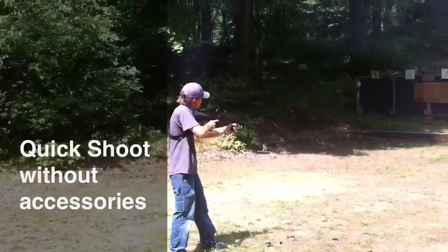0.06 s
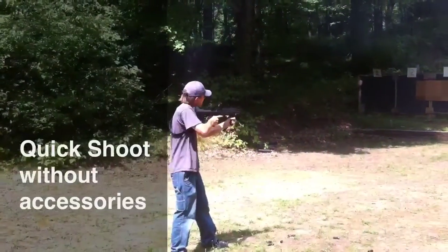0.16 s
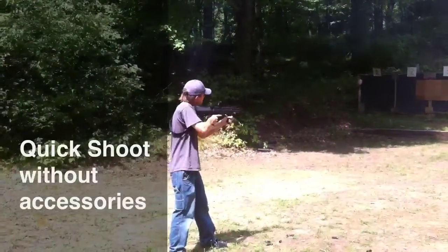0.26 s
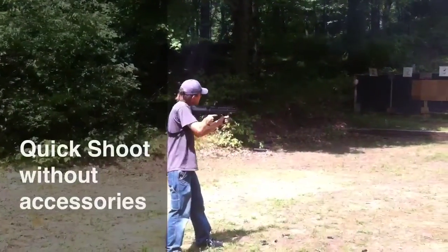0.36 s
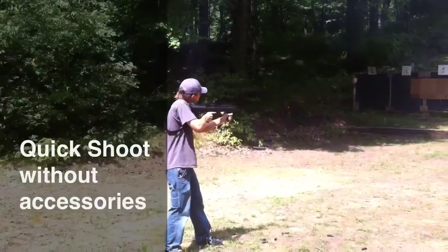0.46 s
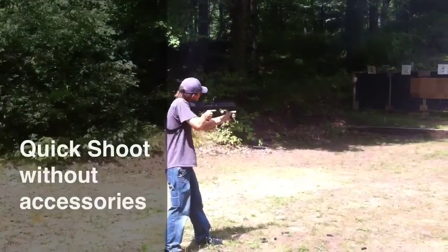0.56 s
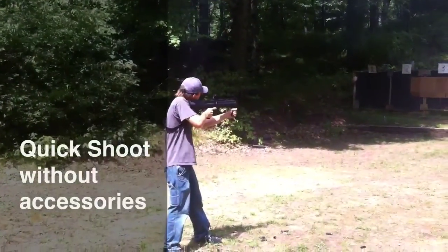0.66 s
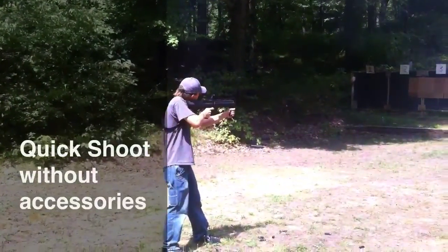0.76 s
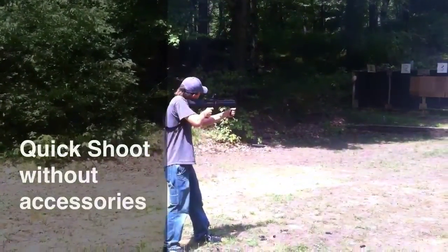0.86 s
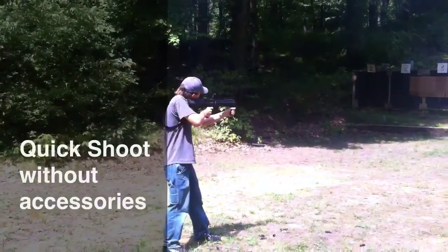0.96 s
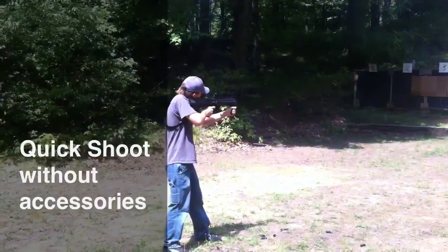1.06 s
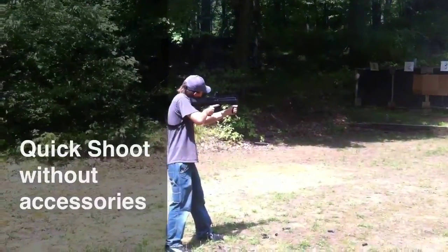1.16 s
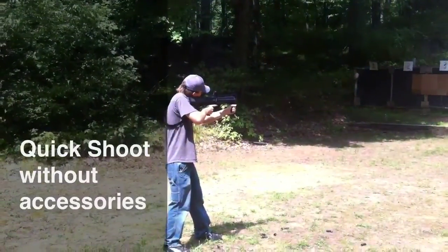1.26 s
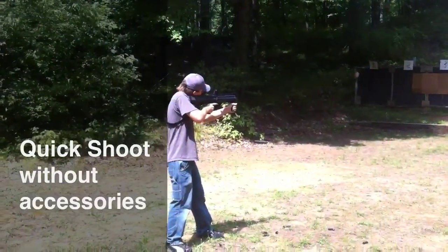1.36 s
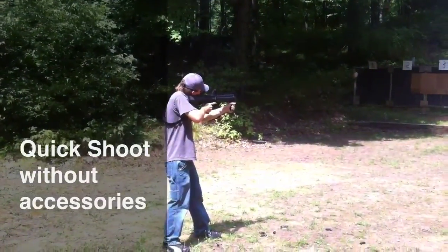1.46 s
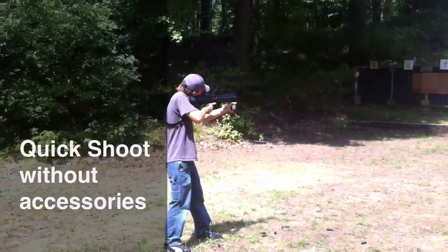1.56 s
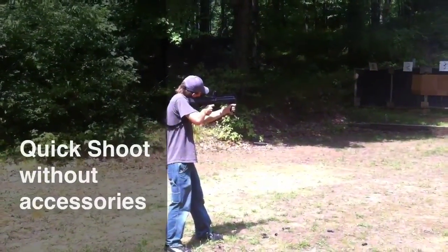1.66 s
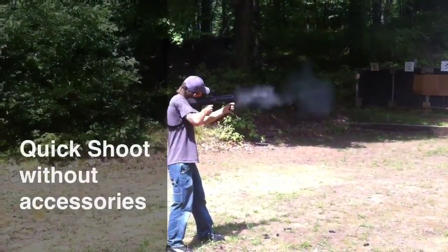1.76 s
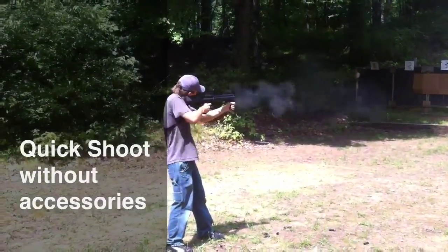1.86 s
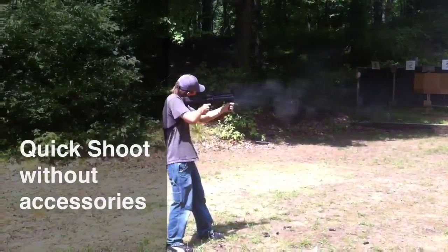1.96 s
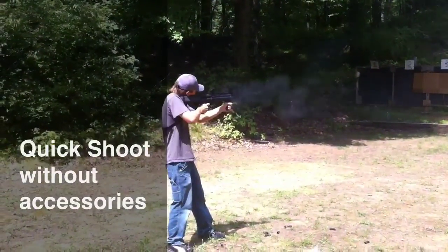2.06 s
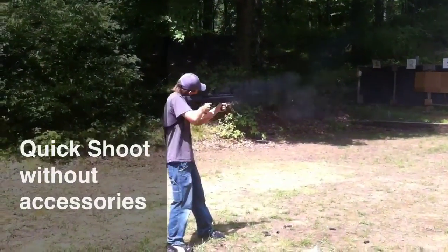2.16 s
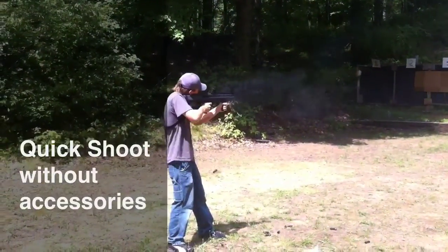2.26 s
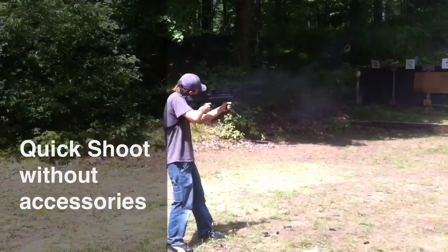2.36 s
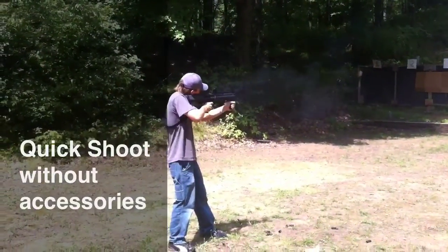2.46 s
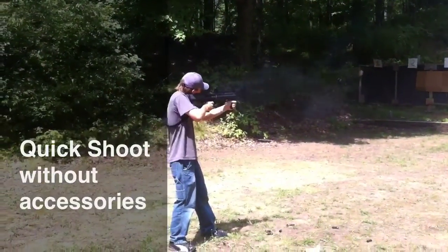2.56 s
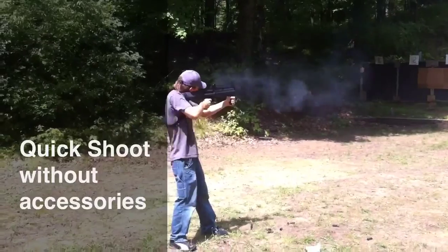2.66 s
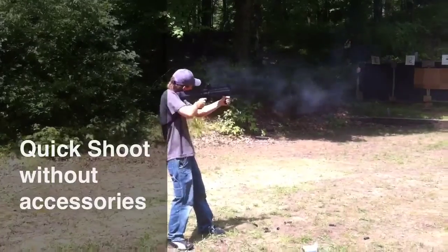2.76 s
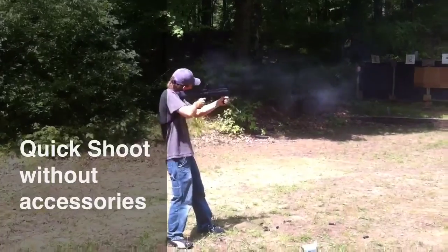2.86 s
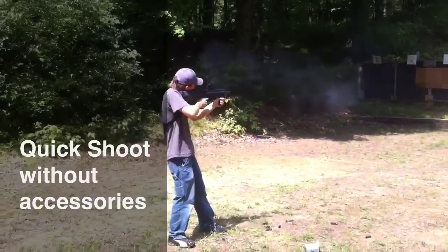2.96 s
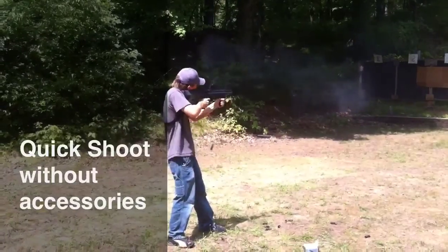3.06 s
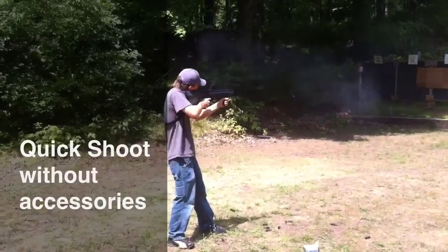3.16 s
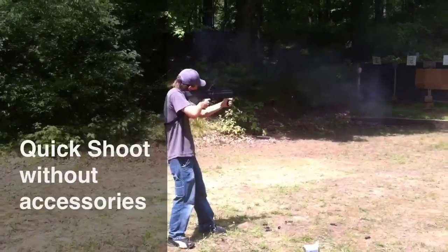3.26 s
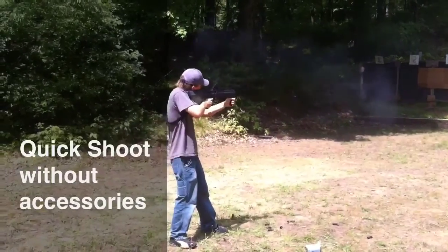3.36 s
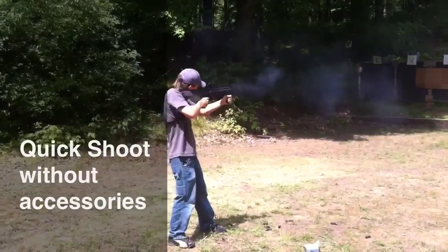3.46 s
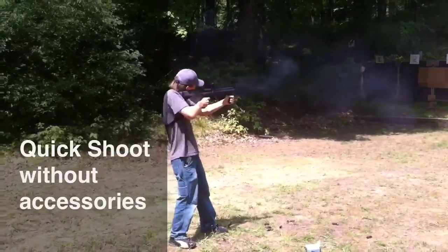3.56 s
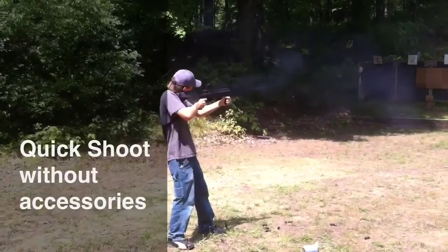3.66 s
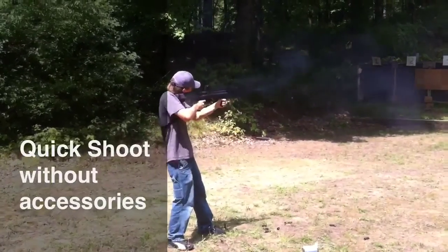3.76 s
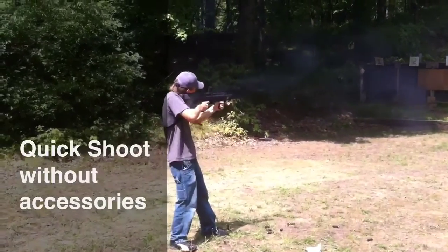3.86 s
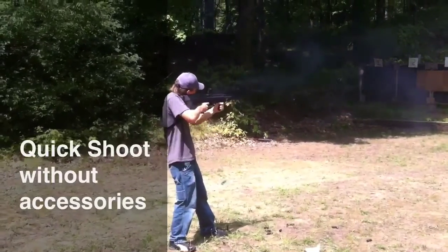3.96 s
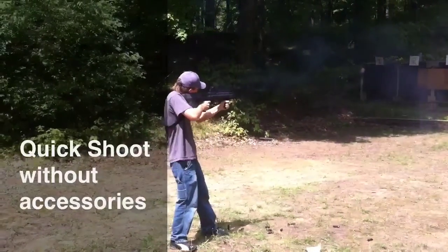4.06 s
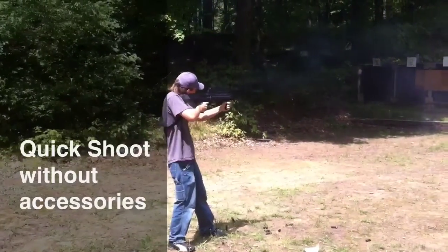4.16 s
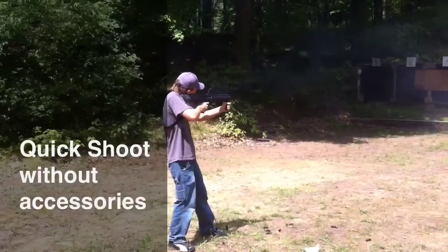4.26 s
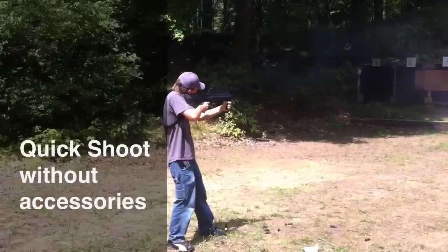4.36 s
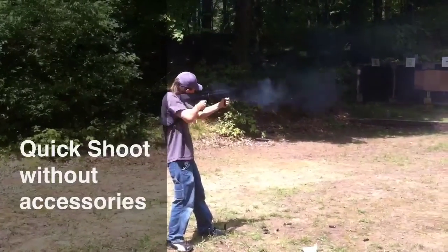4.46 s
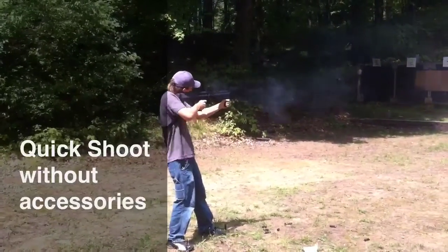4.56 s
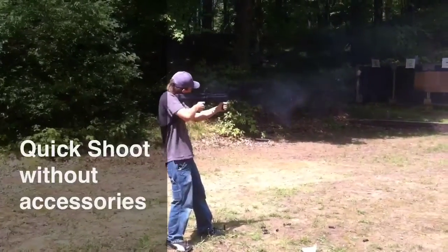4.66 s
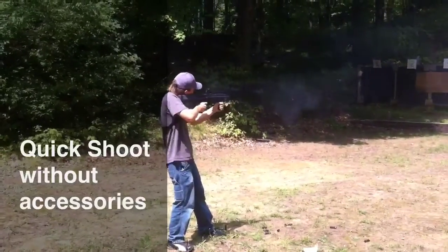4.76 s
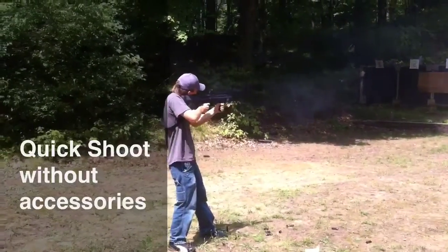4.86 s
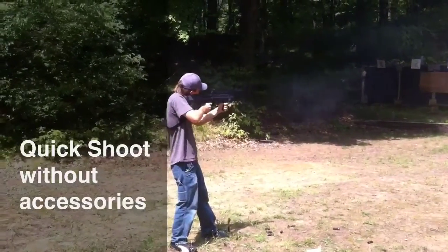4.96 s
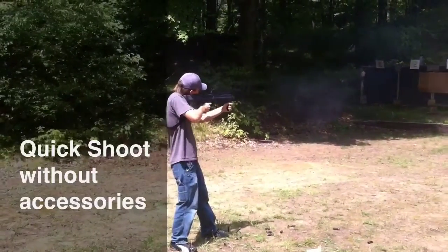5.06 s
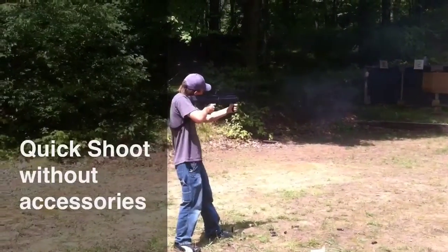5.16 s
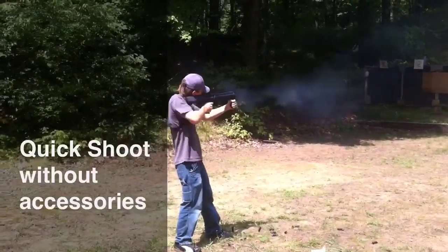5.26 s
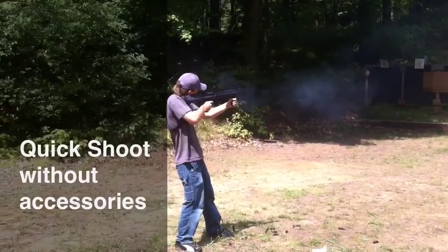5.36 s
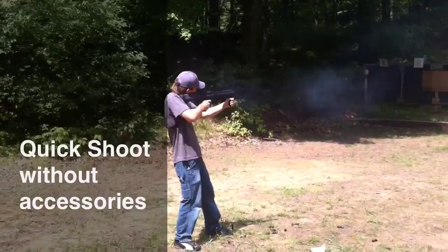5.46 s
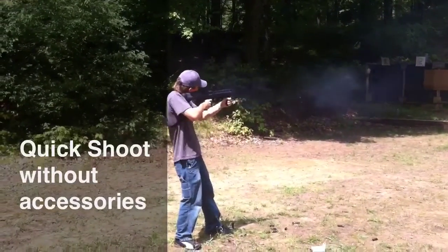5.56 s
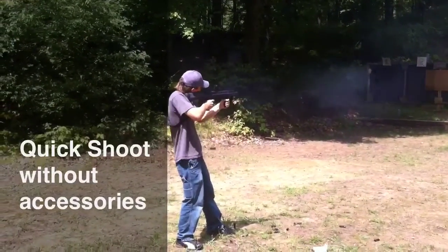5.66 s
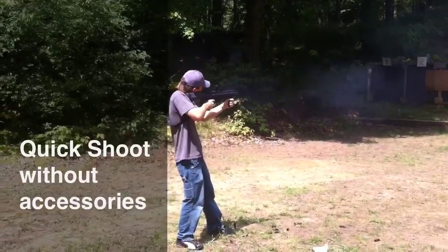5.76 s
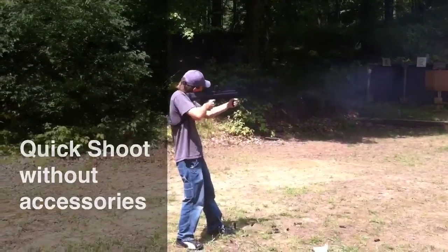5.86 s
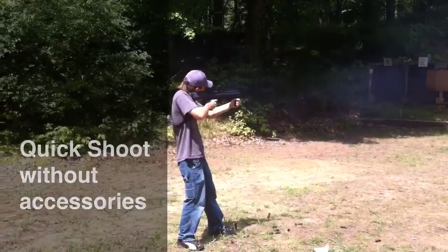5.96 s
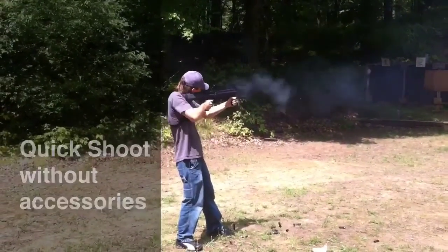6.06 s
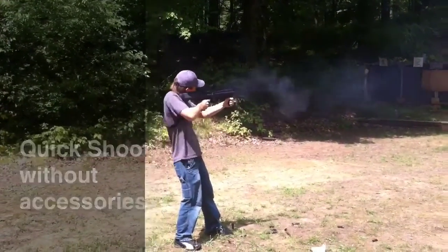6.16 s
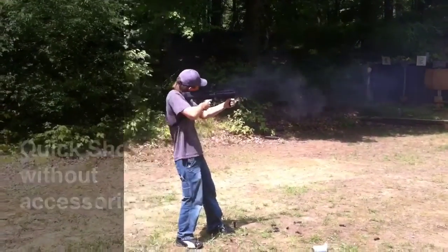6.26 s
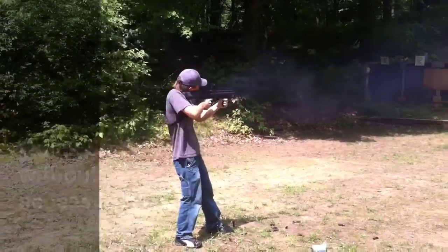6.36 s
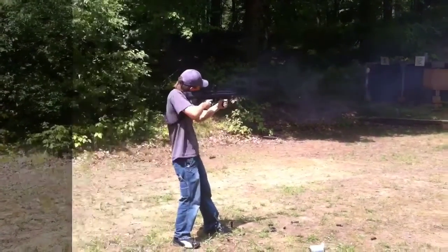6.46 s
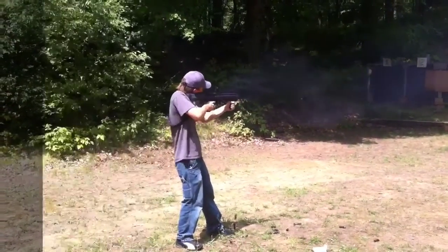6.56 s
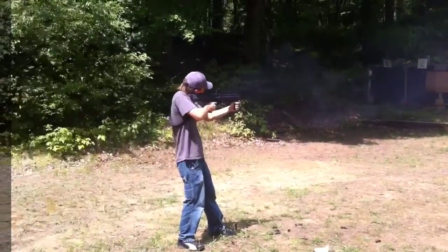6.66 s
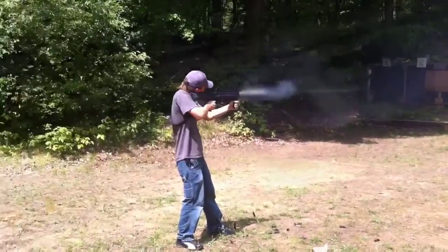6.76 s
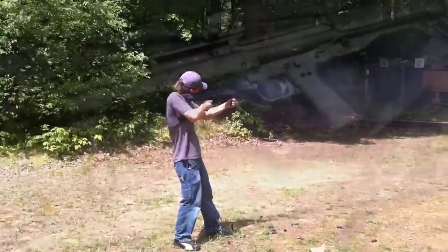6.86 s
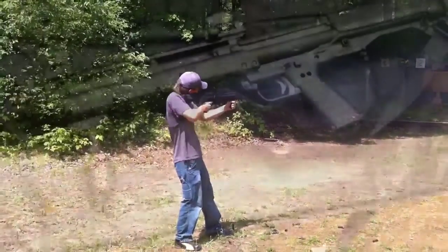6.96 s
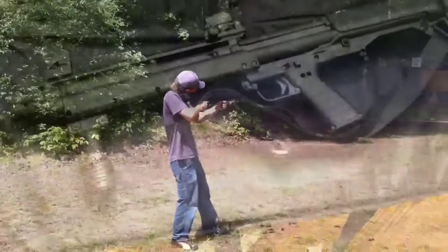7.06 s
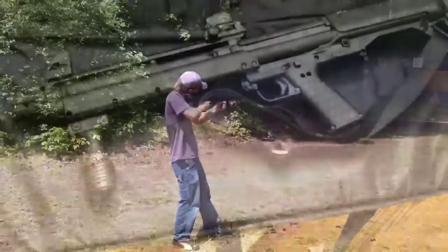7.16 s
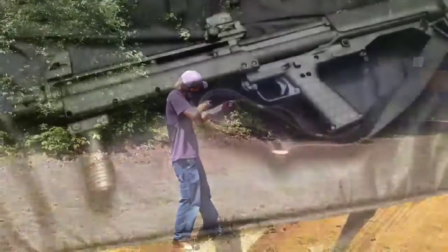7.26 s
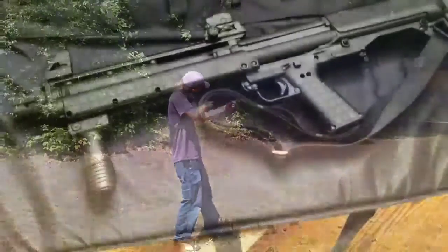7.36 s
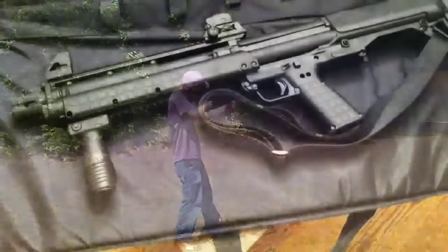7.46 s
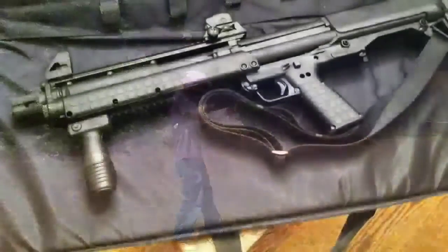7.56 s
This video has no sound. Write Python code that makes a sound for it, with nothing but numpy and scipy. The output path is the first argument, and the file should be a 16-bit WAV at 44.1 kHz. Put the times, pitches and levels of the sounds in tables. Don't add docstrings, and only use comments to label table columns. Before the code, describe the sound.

In a quiet forest clearing, steel parts clack as a shell is chambered. Then a pump shotgun fires seven times, a little under a second apart, a few metres from a small overloading microphone. Each blast is a sharp crack with brief rattle and thump, a hard slap echo, and long hissing tree reverberation. The slide racks back and forward between shots, and the end fades.

```python
import sys
import numpy as np
from scipy import signal
from scipy.fft import rfft, irfft, next_fast_len
from scipy.io import wavfile
from scipy.ndimage import uniform_filter1d

SR = 44100
rng = np.random.default_rng(int(sys.argv[2]) if len(sys.argv) > 2 else 0)


def pcm_store(signal):
    levels = np.round(np.clip(np.atleast_2d(signal), -1, 1) * 32767)
    wavfile.write(sys.argv[1], SR, levels.astype(np.int16).T)


def decibels_to_gain(level_db):
    exponent = np.asarray(level_db, float) / 20
    return 10 ** exponent


N = 335468

# freq_hz, density_db
AIR_SPECTRUM = [(8.8, -29.5), (15, 0), (24, -9), (33, -35), (45, -33), (169, -6.5), (469, -9), (610, -9.5),
                (726, -12.5), (1030, -11.5), (1460, -14), (3410, -15.5), (5760, -17.5), (16000, -24.5)]
# freq_hz, gain_db
DUCK = [(200, -7), (2000, 0), (12000, -4.5)]
# freq_hz, density_db
NEAR_TREES = [(59, -68), (100, -39), (167, -43.5), (577, -19), (865, -18.5), (1000, -12.5), (1440, -8.5),
              (3940, -10.5), (5430, -5), (7020, -11.5), (15100, -24.5), (16500, -38)]
# freq_hz, density_db
FAR_TREES = [(35, -86), (60, -69.5), (147, -25.5), (393, -17), (497, -13), (546, -18), (983, -5.5),
             (1400, -6.5), (1900, 0), (2520, -5.5), (5730, -4.5), (8150, -11.5), (15000, -23.5),
             (16500, -49.5)]
# delay_s, level_db
TREE_SWELL = [(0, -28), (.008, 6.5), (.018, -5), (.03, -3), (.05, 3.5), (.07, -1.5), (.13, 0.5), (.3, 0),
              (1.2, 3.5)]
# freq_hz, t60_s
TREE_DECAY = [(150, 0.9), (400, 2.2), (1000, 1.7), (2000, 1.5), (4000, 1.15), (8000, 0.94), (13000, 0.61)]
# delay_s, level_db
NEAR_WALL = [(0, 8.5), (.0011, -0.5)]
# delay_s, level_db
FAR_WALL = [(.0084, 1), (.009, -11.5), (.0095, 5.5), (.0107, -1.5), (0.0128, -6), (.0131, -13),
            (0.016, -15.5)]
# freq_hz, gain_db
NEAR_COLOUR = [(300, -22), (520, -5), (1000, -2.5), (2200, -3.5), (3500, 1), (5500, -9), (8000, 3),
               (10500, -3), (13000, -14), (16000, -22)]
# freq_hz, gain_db
FAR_COLOUR = [(60, -40), (400, -15), (1100, 0.3), (2200, 5.5), (3200, 5.5), (4500, 10.5), (5100, -6),
              (7600, 8.5), (10000, 2.5), (16000, -16.5)]
# delay_s, level_db, pitch_hz
BANKS = [
    (0.073, -30, 202),
    (0.083, -35, 287),
    (.1015, -31, 250),
    (0.279, -45, 320),
    (.375, -45, 358),
]
# start_s, level_db, swell_s, knock_db
LOADING = [(.261, -41, .002, -8), (.2704, -30, .0008, -13), (.284, -38, .002, -9), (.294, -41, .003, -7),
           (.322, -28, .0037, -1.5), (.326, -23.5, .0062, -11.5), (.385, -29, .001, -12),
           (.396, -50, .006, 2.5), (.425, -49, .002, -14), (.443, -55.5, .0018, -9), (.52, -54, .003, 0.1),
           (.534, -44.5, .007, 3.5), (.555, -54, .002, -9), (.572, -56.5, .002, 7.5),
           (.6408, -28, .0013, -9), (.6468, -28.5, .0045, -6), (.72, -53, .002, -10)]
# stop_s, level_db, case_delay_s, case_db
PULLS = [
    (2.304, -37, .049, -40),
    (3.136, -39, .048, -39),
    (3.982, -37.5, .044, -37.5),
    (4.943, -37, .041, -38.5),
    (5.758, -35, .04, -43),
    (6.526, -41, .033, -43),
    (7.246, -39.5, .04, -52),
]
# lock_s, tap_db, seat_db, nudge_lead_s, nudge_db
PUSHES = [
    (2.5632, -41, -50, .0145, -47),
    (3.3725, -33, -35, .0235, -47),
    (4.287, -52, -42, .007, -46),
    (5.228, -50, -37, .004, -41),
    (5.963, -35, -37, .028, -50),
    (6.747, -37, -36, .024, -47),
    (7.4255, -30.5, -31, .013, -41),
]
# start_s, level_db, t60_s, jingle_db
TICKS = [(.618, -43.5, .055, -2.5), (2.232, -47, .03, 1.5), (2.385, -50, .03, -14), (4.312, -53, .03, -11),
         (4.441, -44, .012, -6), (5.156, -53, .03, -16), (6.652, -56, .04, -4), (6.909, -50, .015, 6),
         (7.356, -49, .03, -7)]
# start_s, stop_s, level_db
SCRAPES = [
    (.33, .42, -54),
    (.57, .74, -58.5),
]
# freq_hz, width_hz, level_db
RECEIVER = [
    [(1400, 1000, -3.5), (1880, 350, 2), (2520, 870, 1)],
    [(5074, 550, -12.5), (5520, 1000, 4), (6100, 810, 3.5), (6480, 700, -9)],
    [(9350, 3200, -7), (11500, 1100, -0.5), (13450, 2100, 3)],
]
# start_s, blast_db, lead_in_db, near_slap_db, far_slap_db
SHOTS = [
    (1.8893, -6, -23, -6.5, -1.3),
    (2.7262, -5, -31, -6.5, 0),
    (3.5609, -6, -25, -5, -2),
    (4.5545, -5.5, -23.5, -6, -3),
    (5.3526, -5.5, -22, -8.5, -3),
    (6.1572, -7, -24.5, -7.5, -2.5),
    (6.9203, -5.5, -25, -5.5, -2),
]
# body_db, accent_hz, accent_db, ring_db, thump_db
LOADS = [(1.5, 1000, -3, 1.5, -20), (-8, 2100, 3.5, 1.7, -17.5), (-5, 1900, 3, -1.3, -29),
         (-10, 1000, -1.5, 1.5, -19.5), (7, 1750, 4, -2.2, -20), (1.2, 1000, -11, 4, -27.5),
         (5, 1600, 1.6, -.4, -26)]
LOAD_EDGES_HZ = (370, 750, 1400, 2600, 4500, 7500)
# freq_hz, density_db
BLAST = [(35, -48.5), (60, -24), (284, -4.5), (878, -8.5), (1510, -0.5), (3130, -6), (4460, -10),
         (5780, 1.5), (8820, -16), (12000, -21), (13200, -12.5), (15500, -19.5), (16700, -42)]
# freq_hz, gain_db
CAPSULE = [(20, -4), (55, -10), (110, -2.5), (160, 0), (15600, 0.5), (16100, -29), (17000, -67)]
# freq_hz, threshold_sd
SPARED = [(7000, 3.5), (9500, 1.6), (16000, 1.05)]
# time_s, gain_db
FADE = [(6.85, -2), (7.1, -6), (7.3, -8), (7.5, -13), (7.61, -18)]

AIR_DB, WOODS_DB = -59, -29.2
SLAP_DELAY_S = .0617

# swell_s, t60_s, knock_db, jingle_db
TAP, SEAT = (.0009, .026, -8, -9), (.0055, .038, -6, -10)
NUDGE, STOP, EJECT = (.002, .042, -3, -3), (.009, .042, -6, -9), (.001, .024, -5, -15)
GRIP, DRAG = (.003, .055, -2.5, -8), (.01, .075, -10, -6)


def unit(x):
    return x / np.sqrt(np.mean(x ** 2) + 1e-20)


def along(points, hz):
    f, v = np.transpose(points)
    return np.interp(np.log(hz + 1), np.log(f + 1), v)


def curve(rows, t):
    return np.interp(t, *np.transpose(rows))


def add(x, start_s, piece):
    part = x[round(start_s * SR):][:len(piece)]
    part += piece[:len(part)]


def patches(shape, bins, frames):
    field = uniform_filter1d(rng.standard_normal(shape), size=bins, axis=0)
    return unit(uniform_filter1d(field, size=frames, axis=1))


def tinted(x, points):
    size = next_fast_len(len(x) + 8192)
    gain = decibels_to_gain(along(points, np.fft.rfftfreq(size, 1 / SR)))
    return irfft(rfft(x, size) * gain, size)[:len(x)]


def causal(x, points):
    size = 4096
    gain = decibels_to_gain(along(points, np.fft.rfftfreq(size, 1 / SR)))
    cep = irfft(np.log(gain + 1e-6))
    cep[1:size // 2] *= 2
    cep[size // 2 + 1:] = 0
    return signal.fftconvolve(x, irfft(np.exp(rfft(cep))))[:len(x)]


def hiss(size, spectrum, patchy_db, t60=None):
    noise = unit(tinted(rng.standard_normal(size), spectrum))
    hz, t, z = signal.stft(noise, SR, nperseg=256)
    z = z * decibels_to_gain(patchy_db * patches(z.shape, bins=5, frames=8))
    if t60:
        z = z * decibels_to_gain(-60 * (t - .1) / along(t60, hz)[:, None])
    return signal.istft(z, nperseg=256)[1][:size]


def shock(t, width_s):
    u = np.maximum(t, 0) / width_s
    return (t >= 0) * (1 - u) * np.exp(-(u / 1.88) ** 1.91)


def air():
    calm = decibels_to_gain(AIR_DB) * hiss(N, AIR_SPECTRUM, patchy_db=1.3)
    before = np.arange(N) / SR < SHOTS[0][0]
    return np.where(before, calm, causal(calm, DUCK))


def woods():
    out, size = np.zeros(N), round(1.2 * SR)
    t = np.arange(size) / SR
    far = np.clip((t - .05) / .069, 0, 1)
    for start_s, *_ in SHOTS:
        near_hiss = decibels_to_gain(.5) * hiss(size, NEAR_TREES, patchy_db=1.9)
        far_hiss = hiss(size, FAR_TREES, patchy_db=1.5, t60=TREE_DECAY)
        mix = np.sqrt(1 - far) * near_hiss + np.sqrt(far) * far_hiss
        gone_s = next((later[0] - start_s for later in SHOTS if later[0] > start_s), 2)
        add(out, start_s, decibels_to_gain(WOODS_DB + curve(TREE_SWELL, t)) * mix * (t < gone_s))
    return out


def wall(row, slap_s, paths, db, width_s, rough_db):
    t = np.arange(SR // 30) / SR
    for k, (delay_s, path_db) in enumerate(paths):
        shift, size = rng.standard_normal(2) * (k > 0)
        level = decibels_to_gain(db + path_db + 1.7 * size)
        add(row, slap_s + delay_s + .00008 * shift, level * shock(t, width_s))
    facets = rng.standard_normal(len(t)) * np.minimum(t / .00122, 1) * decibels_to_gain(-60 * t / .041)
    smear = np.convolve(facets, shock(t[:80], width_s)) / 2
    add(row, slap_s + paths[0][0], decibels_to_gain(db + rough_db) * smear)


def slaps():
    near, far, low = np.zeros((3, N))
    t = np.arange(SR // 30) / SR
    for start_s, _, _, near_db, far_db in SHOTS:
        wall(near, start_s + SLAP_DELAY_S, NEAR_WALL, near_db, width_s=.00017, rough_db=-17)
        wall(far, start_s + SLAP_DELAY_S, FAR_WALL, far_db, width_s=.00012, rough_db=-13)
        for delay_s, db, pitch_hz in BANKS:
            thud = np.sin(2 * np.pi * pitch_hz * t) * decibels_to_gain(-60 * t / .037) * (1 - np.exp(-t / .0014))
            add(low, start_s + delay_s, decibels_to_gain(db + 31.5 + WOODS_DB + rng.normal(0, 1.2)) * thud)
    return causal(near, NEAR_COLOUR) + causal(far, FAR_COLOUR) + low


def contacts():
    rows = []
    for s, db, swell_s, knock_db in LOADING:
        rows.append((s, db, swell_s, .021 + 3.2 * swell_s, knock_db, -11.5))
    for s, db, t60_s, jingle_db in TICKS:
        rows.append((s, db, .0015, t60_s, -12, jingle_db))
    for s, db, case_delay_s, case_db in PULLS:
        case_s = s + case_delay_s
        rows.append((s - .016, db - 5, *GRIP))
        rows.append((s - STOP[0], db, *STOP))
        rows.append((case_s, case_db, *EJECT))
        rows.append((case_s + .004, case_db - 13.5, *DRAG))
    for s, tap_db, seat_db, nudge_lead_s, nudge_db in PUSHES:
        rows.append((s - nudge_lead_s, nudge_db, *NUDGE))
        rows.append((s, tap_db, *TAP))
        rows.append((s + .0045, seat_db, *SEAT))
    return rows


def slide():
    drive, t = np.zeros((3, N)), np.arange(SR // 10) / SR
    for s, db, swell_s, t60_s, knock_db, jingle_db in contacts():
        shape = np.minimum(t / swell_s, 1) ** 2 * decibels_to_gain(-60 * np.maximum(t - swell_s, 0) / t60_s)
        shape = shape + decibels_to_gain(-43 - 60 * t / .11)
        for row, part_db, speed in zip(drive, (knock_db, 0, jingle_db), (1, 1, 1.25)):
            add(row, s, decibels_to_gain(db + part_db) * shape ** speed)
    now = np.arange(N) / SR
    for start_s, stop_s, db in SCRAPES:
        ramp_db = np.minimum(400 * (now - start_s), 200 * (stop_s - now))
        drive += decibels_to_gain(db + np.minimum(0, ramp_db) + [[-4], [0], [-12]])
    size = next_fast_len(N)
    f = np.fft.rfftfreq(size, 1 / SR)
    clumps = decibels_to_gain(1.5 * unit(uniform_filter1d(rng.standard_normal(N), size=60)))
    out = np.zeros(N)
    for row, modes in zip(drive, RECEIVER):
        band = 0
        for hz, width_hz, db in modes:
            damping = 1j * f * width_hz
            band = band + decibels_to_gain(db) * (damping / (hz * hz - f * f + damping)) ** 1.47
        band = band / (1 + (900 / (f + 1)) ** 4)
        rattle = irfft(rfft(rng.standard_normal(size)) * band, size)[:N]
        out += row * unit(clumps * rattle)
    return out


def rattle_burst(t, shape, load):
    body_db, accent_hz, accent_db, ring_db, _ = load
    hz = np.fft.rfftfreq(len(t), 1 / SR)
    band = np.searchsorted(LOAD_EDGES_HZ, hz)
    middle_hz = np.sqrt(np.multiply(LOAD_EDGES_HZ[1:-2], LOAD_EDGES_HZ[2:-1]))
    octaves = np.log2(middle_hz / accent_hz)
    tint_db = np.r_[-12, body_db, accent_db * np.exp(-(octaves / .6) ** 2), ring_db, 0]
    noise = rfft(unit(causal(rng.standard_normal(len(t)), BLAST)))
    energy = np.bincount(band, decibels_to_gain(2 * along(BLAST, hz)))
    energy *= decibels_to_gain(2 * tint_db) * np.sum(shape ** 2) / energy.sum()
    parts = np.array([shape * irfft(noise * (band == k), len(t)) for k in range(len(energy))])
    return np.sqrt(energy / np.sum(parts ** 2, axis=1)) @ parts


def blasts():
    out, t = np.zeros(N), np.arange(SR // 20) / SR - .005
    front = shock(t, width_s=.00009)
    since = np.maximum(t, 0)
    after = np.maximum(t - .0035, 0)
    body = (t >= 0) * (decibels_to_gain(-60 * after / .012) + decibels_to_gain(-16 - 60 * after / .033))
    cycles = 130 * since + 330 * .0035 * (1 - np.exp(-since / .0031))
    thump = since / .0015 * np.exp(-since / .0023) * np.sin(2 * np.pi * cycles)
    for (start_s, blast_db, lead_db, *_), load in zip(SHOTS, LOADS):
        lead = (t < 0) * (decibels_to_gain(lead_db - 8100 * np.abs(t + .0023)) + decibels_to_gain(lead_db - 18 + 1600 * t))
        burst = rattle_burst(t, decibels_to_gain(blast_db) * body + lead, load)
        add(out, start_s - .005, burst + decibels_to_gain(load[-1] + 9.5) * thump + decibels_to_gain(blast_db + 5) * front)
    return out


def scene():
    return (blasts() + slaps() + slide() + woods() + air())[None]


def starved(x):
    block, block_start, treble_hz = 1024, 700, 7800
    hz, t, z = signal.stft(x, SR, nperseg=128, noverlap=96)
    treble = (hz >= treble_hz)[:, None]
    power = np.sum(np.abs(z[hz >= treble_hz]) ** 2, axis=0)
    level_db = 10 * np.log10(uniform_filter1d(power, size=3) + 1e-12)
    index = ((t * SR + block - block_start) // block).astype(int)
    top_db = np.maximum.reduceat(level_db, np.searchsorted(index, np.arange(index[-1] + 1)))
    below_db = (top_db[index] - level_db) * (level_db < -58)
    jump_db = np.maximum(15 + 5 * patches(z.shape, bins=3, frames=5), 6)
    z[(below_db > 36) | (below_db > jump_db) & treble] *= decibels_to_gain(-29.5)
    x = signal.istft(z, SR, nperseg=128, noverlap=96)[1]

    hz, t, z = signal.stft(x, SR, nperseg=512)
    field = patches(z.shape, bins=2, frames=20)
    missing = (field > along(SPARED, hz)[:, None]) & (t > SHOTS[0][0])
    return signal.istft(z * np.where(missing, decibels_to_gain(-20), 1), SR, nperseg=512)[1][:N]


def roll_off(x):
    return signal.sosfilt(signal.butter(12, 16810, fs=SR, output="sos"), x)


def record(dry):
    x = dry / (1 + np.abs(dry / 1.06) ** 9.5) ** (1 / 4.5)
    x = starved(causal(x[0], CAPSULE))[None]
    x = x * decibels_to_gain(curve(FADE, np.arange(N) / SR))
    return roll_off(x)


dry = scene()
out = record(dry)
pcm_store(out)
```